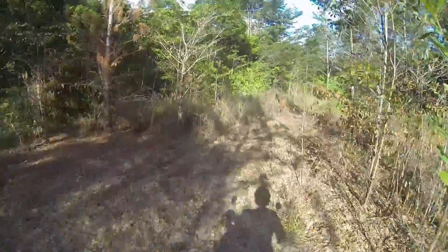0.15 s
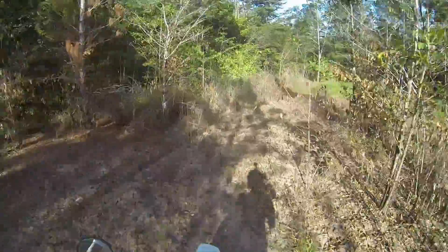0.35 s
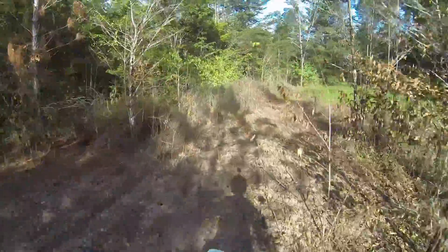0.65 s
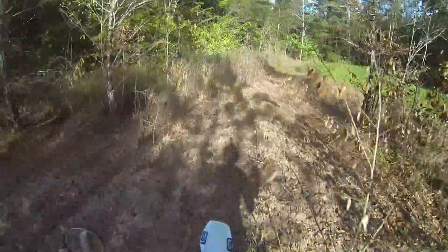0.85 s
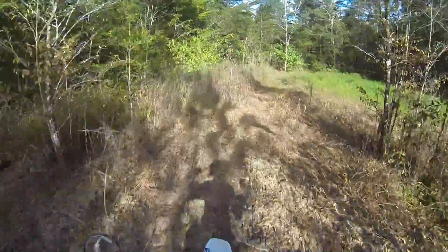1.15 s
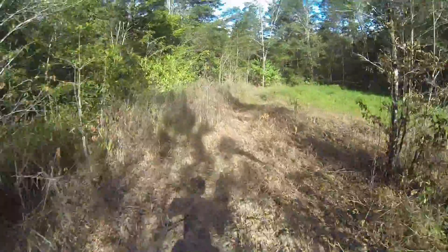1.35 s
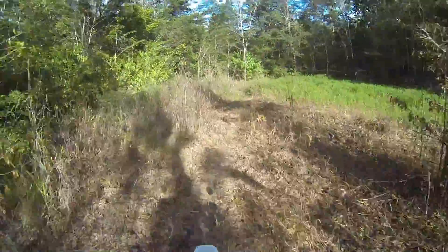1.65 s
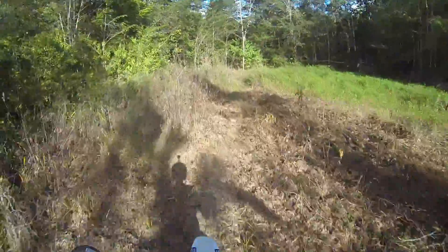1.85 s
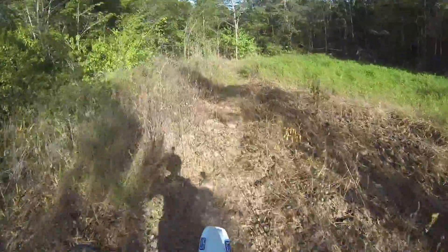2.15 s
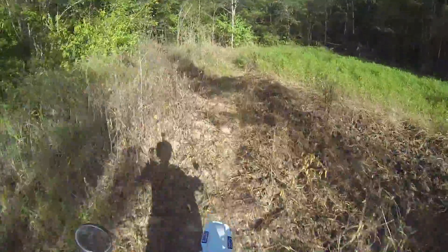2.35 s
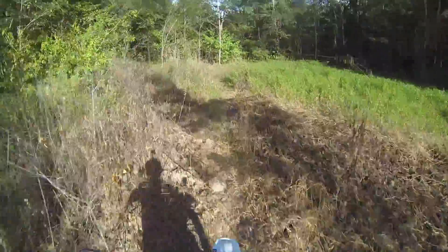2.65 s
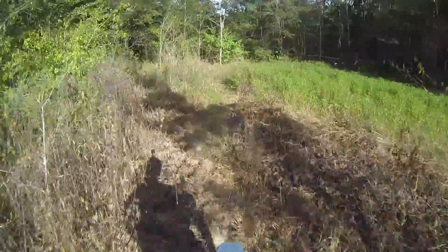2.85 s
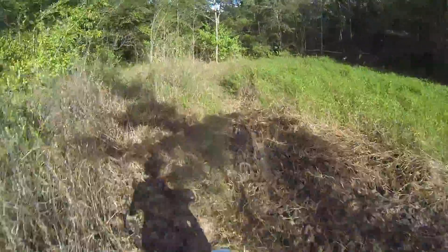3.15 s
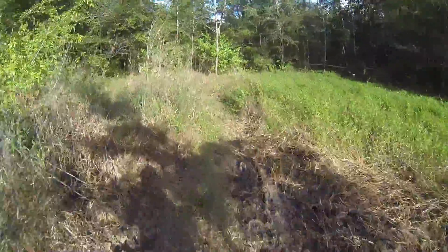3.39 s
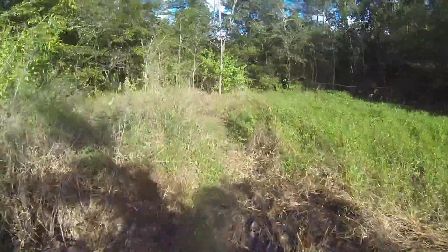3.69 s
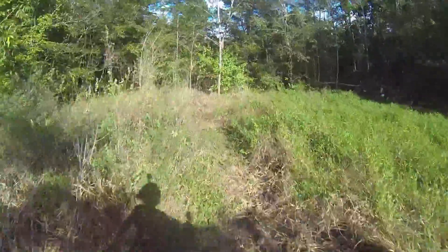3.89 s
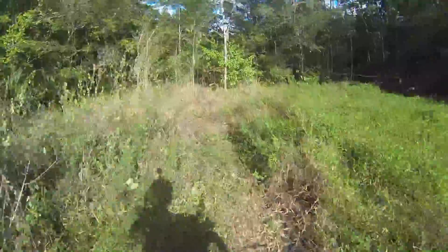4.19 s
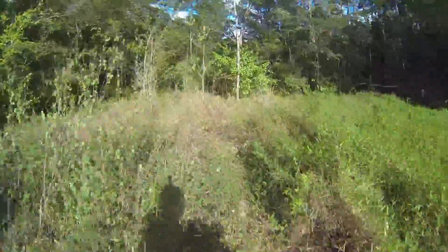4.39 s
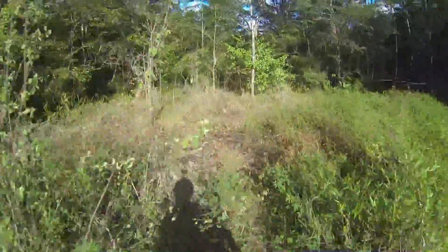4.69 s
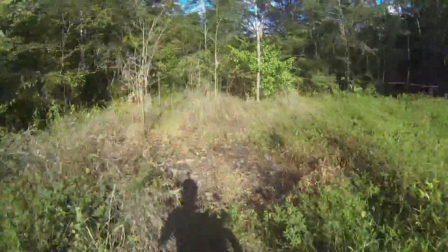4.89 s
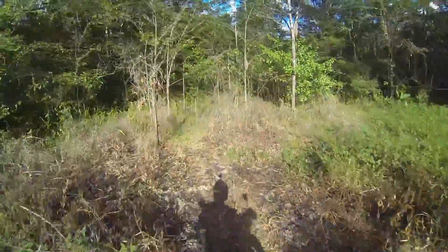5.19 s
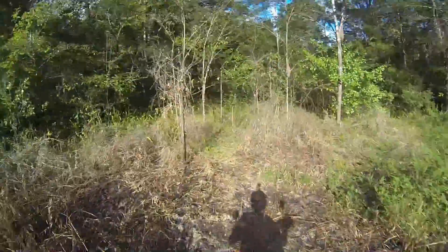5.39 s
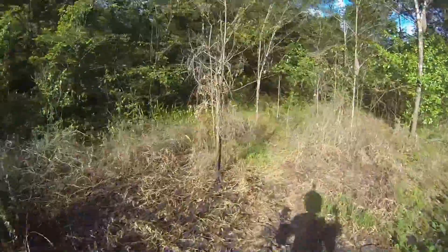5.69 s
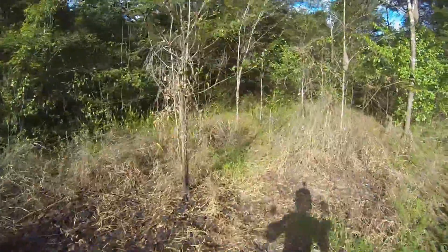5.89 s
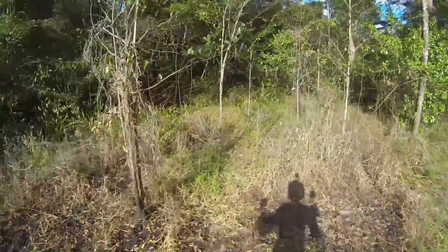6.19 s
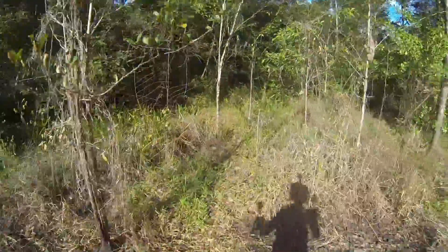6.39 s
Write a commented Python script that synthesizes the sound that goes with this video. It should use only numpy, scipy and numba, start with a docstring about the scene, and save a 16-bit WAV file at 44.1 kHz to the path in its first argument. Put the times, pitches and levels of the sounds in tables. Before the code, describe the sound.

Muffled two-stroke motorbike engine rises briefly, then drops toward idle amid frequent short knocks and low wind rumble.

```python
"""A small two-stroke dirt bike on a forest trail, heard from a helmet camera shut in its plastic case.
The engine is a pulse train with puffs of gas, dulled by the resonances of exhaust and case. Jolts
sway the camera on its mount near 105 Hz, knocks excite the modes of the case, and a loose part
chatters. Wind rumbles and thumps on the microphone membrane. A gain control ducks after each loud
thump or knock, over a faint hiss."""
import sys
import numpy as np
from scipy import signal
from scipy.io import wavfile
from scipy.ndimage import uniform_filter1d
from numba import njit

SR = 44100
rng = np.random.default_rng(int(sys.argv[2]) if len(sys.argv) > 2 else 0)


def put_to_file(sound):
    """Save the sound as 16-bit audio at rate SR, in the file named by the first command-line argument."""
    columns = np.atleast_2d(sound).T  # one column per channel
    safe = np.clip(columns, -1, 1)
    whole_steps = np.round(safe * 32767)
    wavfile.write(sys.argv[1], SR, whole_steps.astype(np.int16))


N = 288406


def engine():
    """Source and filter: uneven firings, each with a puff of gas, drive the exhaust and case resonances."""
    # course of the ride: (time [s], firing rate [Hz], relative level [dB])
    ride = [(0.0, 53.05, -44), (0.16, 51.55, -41), (0.62, 63.2, -44), (0.72, 64.22, -40.5),
            (1.26, 74.03, -38), (1.48, 78.37, -36.5), (1.69, 69.95, -48), (2.24, 55.45, -48),
            (2.57, 51.81, -46), (3.02, 42.06, -46.5), (3.4, 40.07, -44), (3.65, 43.32, -43.5),
            (3.84, 37.57, -44.5), (4.0, 38.66, -43.5), (4.33, 39.39, -53), (4.79, 39.81, -48.5),
            (5.1, 34.5, -49.5), (5.59, 32.17, -54), (5.85, 31.56, -50), (6.05, 31.97, -47.5),
            (6.15, 32.88, -46), (6.35, 32.32, -47.5), (6.54, 31.76, -53.5)]
    # resonances of exhaust and case: (frequency [Hz], nominal width [Hz], relative gain [dB])
    resonances = [(165, 52, -13.5), (233.4, 16, 8.5), (241.8, 20.4, 10.5), (302, 89, -0.5), (402, 74, 7.5),
                  (534, 45, 11.5), (710, 484, -1.5), (960, 64, 2.5), (1137, 210, 0.5), (1240, 45, 1),
                  (1560, 48, 4), (2470, 70, -12), (1650, 152, 2), (2147, 410, -11.5), (2610, 170, -14.5),
                  (2830, 840, -25.5), (3564, 396, -16.5), (3514, 84, -12.5), (4460, 1100, -28),
                  (6500, 6100, -41), (11000, 2800, -69.5)]
    # vibration through frame and rider: (multiple of the firing rate, relative level at full pull [dB])
    shake_orders = [(3, -7), (4, -7.5), (6, -19), (8, -21)]
    cruise_db, treble_from_hz = -46, 2300
    lope_start_s, lope_length_s, pickup_lope_db, idle_lope_db = 5.884, .24, -7.5, -3
    hz, db = curves(ride)
    pull_db = db - cruise_db
    clean = np.clip(.65 + .025 * pull_db, 0, 1)  # a harder pull fires more evenly
    treble_db = 3 + 4.5 * np.log2(hz / hz[0]) - .07 * pull_db  # rises with speed, trails the pull
    turns = np.cumsum(hz * (1 + .004 * walk(15))) / SR
    turns = turns + 500 - turns[int(lope_start_s * SR)]  # a strong firing opens the lope
    cycle = turns.astype(int)
    # lope: every other turn fires weakly near idle, more so as the engine picks up
    idle = np.clip((42 - hz) / 10, 0, 1)
    since = np.arange(N) / SR - lope_start_s
    lope_db = np.where((since > 0) & (since < lope_length_s), pickup_lope_db, idle_lope_db * idle)
    strength = undb(1.2 * rng.standard_normal(size=1000)[cycle] + lope_db * (cycle % 2 - .5))
    firings = level(np.diff(cycle, prepend=cycle[0]) * strength ** (1 - clean), 0)
    puffs = strength * np.exp(-(turns - cycle) / 0.35)
    rattle = .5 - .25 * idle  # less near idle, so the puffs stand apart
    gas = level((puffs + rattle) * rng.standard_normal(N), 0)
    low = np.sqrt(clean) * firings + np.sqrt(1 - clean) * gas
    middle = gas + (.75 + .1 * idle) * firings
    whirr = .6 * gas + .8 * rng.standard_normal(N)
    dull, bright = 0, 0
    for k, (centre_hz, width_hz, peak_db) in enumerate(resonances):
        if centre_hz < 600:
            drive = low
        elif centre_hz > treble_from_hz:
            drive = whirr
        else:
            drive = middle if width_hz < 300 else gas  # firings ring the narrow resonances
        polarity = (-1) ** (k * (width_hz > 50))
        flicker_db = min(centre_hz / 400, 1.5) * walk(25)
        ring = polarity * undb(peak_db + flicker_db) * band(drive, centre_hz, 1.4 * width_hz)
        if centre_hz < treble_from_hz:
            dull = dull + ring
        else:
            bright = bright + ring
    shake = sum(undb(order_db + 3.7 * walk(18)) * np.sin(2 * np.pi * order * turns)
                for order, order_db in shake_orders)
    return undb(db + 4.5) * ((dull + undb(treble_db) * bright) / np.std(dull) + clean * shake)


def mount():
    """Mass on a spring: the camera sways near its natural frequency, roughened by the trail."""
    sway_hz, wander_hz = 105.4, 2.1
    phase = 2 * np.pi * np.cumsum(sway_hz + wander_hz * walk(20)) / SR
    tone = np.sqrt(2) * undb(2.0 * walk(30)) * np.sin(phase)
    roughness = level(band(rng.standard_normal(N), 112, 49), -13.5)
    return swing() * (tone + roughness)


def swing():
    """Damped oscillation: each jolt lifts the mount's amplitude, which decays until it is caught."""
    # jolts of the trail: (time [s], level [dB], duration until caught [s])
    jolts = [(0.0, -23, 0.071), (0.09, -13, 0.1), (0.506, -10.5, 0.13), (0.698, -14, 0.1),
             (0.941, -10, 0.054), (1.086, -15.5, 0.14), (1.188, -14, 0.083), (1.299, -13.5, 0.21),
             (1.583, -10.5, 0.1), (1.731, -17, 0.089), (1.839, -14.5, 0.047), (1.957, -19, 0.1),
             (2.398, -23, 0.051), (2.447, -20.5, 0.05), (2.504, -17.5, 0.055), (2.596, -18.5, 0.49),
             (2.88, -15, 0.095), (3.02, -26.5, 0.059), (3.198, -29.5, 0.073), (3.537, -25, 0.11),
             (3.689, -17.5, 0.14), (3.857, -16.5, 0.1), (3.98, -16.5, 0.11), (4.11, -23, 0.21),
             (4.278, -20.5, 0.12), (4.455, -30.5, 0.046), (4.559, -17.5, 0.11), (4.691, -14, 0.18),
             (4.925, -21.5, 0.095), (5.007, -18, 0.16), (5.208, -30, 0.16), (5.346, -22, 0.071),
             (5.442, -24, 0.1), (5.658, -29.5, 0.21), (5.887, -25.5, 0.064), (6.057, -27, 0.11),
             (6.25, -31.5, 0.11), (6.471, -26.5, 0.039)]
    rise_s, catch_s, decay_db_per_s, rest_db = 0.0095, 0.032, 41, -39.5
    t = np.arange(N) / SR
    amplitude = np.full(N, undb(rest_db))
    for s, db, length in jolts:
        rise, catch = (t - s) / rise_s, (s + length - t) / catch_s + 1
        gate = np.clip(np.minimum(rise, catch), 0, 1)
        amplitude = np.maximum(amplitude, undb(db - decay_db_per_s * np.abs(t - s)) * gate)
    return amplitude


def knocks():
    """Modal ringing: knocks and a faint random rattle excite the case, each with its own mix of modes."""
    # blows on the case: (time [s], level [dB], dull, middle and bright parts re the main part [dB])
    impacts = np.array([(0.082, -30, -5.5, -2, -24), (0.1333, -28, -6, -1, -31),
                        (0.1926, -4.5, -16.5, -11, -10), (0.474, -27, -9, -3.5, -17),
                        (0.514, -25, -5.5, -4, -17), (0.5294, -13, -15.5, -7, -15.5),
                        (0.7012, -35.5, 3.5, 4.5, -25), (0.7778, -16.5, -8, -5.5, -18.5),
                        (0.947, -10.5, -13, -6.5, -22.5), (1.1432, -29, -3.5, -28, -21),
                        (1.305, -42.5, 11, -8, -22), (1.3309, -30, -1, 4, -7), (1.5203, -29, -5, -2, -28),
                        (1.5921, -23.5, 2.5, 6, -17.5), (1.745, -25.5, -17, -3.5, -16.5),
                        (1.8591, -35.5, -9, 0, -28), (1.9113, -50, 6, 17, -39), (1.9578, -27, -0.5, 5, -25),
                        (2.0088, -27, -13, -7, -18), (2.0464, -28.5, -3.5, 1.5, -35),
                        (2.1864, -42.5, 5, 2, 0), (2.407, -35, -14, 0, -31),
                        (2.4368, -11.5, -7.5, -2.5, -20), (2.4799, -34, -9, -11, -25),
                        (2.5105, -29.5, 1, 5, -16), (2.77, -36, -9, 2.5, -30),
                        (2.9217, -18.5, -9.5, -6, -22), (2.954, -41, 7, 6, -17),
                        (3.2117, -39.5, -9, -6, -7), (3.5335, -44.5, 9.5, -10, -27),
                        (3.587, -41, -4, -8, -10), (3.6921, -28, -17, -13, -29),
                        (3.719, -32, -17, -0.5, -25), (3.7545, -27.5, -11, -7, -32),
                        (3.856, -46, 8.5, -14, -34), (3.962, -55, 21, -2, -14), (4.0122, -25, -9, -2, -21),
                        (4.1118, -16.5, -8.5, -4, -14.5), (4.1942, -27, -7, -12, -15.5),
                        (4.2936, -39.5, 6, -13, -15), (4.481, -44.5, 3.5, -2, -25),
                        (4.638, -52, 15.5, 2.5, -27), (4.7115, -41, 1, 10.5, -5),
                        (4.7364, -28, -31, -3, -31), (4.9077, -48, -18, -11, 2),
                        (4.9339, -35.5, 0.5, -2, -27), (4.9551, -20, -9.5, -5.5, -17.5),
                        (5.0136, -31.5, 2, 0, -20), (5.0274, -39, -13, 7, -12), (5.1027, -49, 14, -4, -34),
                        (5.208, -55.5, 18, -9, -22), (5.25, -34.5, -29, -7, -19),
                        (5.2788, -27, -15, -1.5, -29), (5.3218, -41.5, 10.5, -0.5, -28),
                        (5.3472, -41, 1.5, -8, -4), (5.436, -54.5, -12, -15, -0.5),
                        (5.846, -41.5, -23, -16, -14), (5.905, -36.5, -4, -26, -11),
                        (6.4761, -36, -1, -3, -27)])
    # modes of the case: (frequency [Hz], relative gain [dB], time to decay by 60 dB [s])
    modes = [(133, 8, 0.086), (231, -2, 0.049), (410.3, 8, 0.065), (550.5, 4, 0.072), (818, -0.5, 0.0073),
             (885, -3.5, 0.034), (1060, 10.5, 0.015), (1473, -3.5, 0.016), (1726, 8.5, 0.008),
             (2345, -1, 0.027), (2560, 9, 0.017), (3106, 3, 0.014), (3587, 6, 0.01), (4440, -4.5, 0.0038),
             (5250, -10.5, 0.018), (5960, -11.5, 0.012), (10800, -16.5, 0.0037)]
    edges_hz = [800, 1280, 2300]  # between the dull, middle, main and bright parts
    touch, touch_lead_s, scrape_s, scrape_db = .3, .0006, .0012, -21
    rattle_place, rattle_strength = rng.random(size=(40, 2)).T
    at = (np.r_[impacts[:, 0], rattle_place * (N - 1) / SR] * SR).astype(int)
    blow_db = np.r_[impacts[:, 1], -52 + 11 * rattle_strength]
    rattle_parts_db = np.tile([-1.5, -4, -26], (len(rattle_place), 1))
    dull_db, middle_db, bright_db = np.vstack([impacts[:, 2:], rattle_parts_db]).T
    parts_db = [dull_db, middle_db, 0, bright_db]
    grit = undb(scrape_db) * rng.standard_normal(N)
    mix_db = 2 * rng.standard_normal((len(at), len(modes)))
    out = np.zeros(N)
    for k, (hz, db, t60) in enumerate(modes):
        blows = np.zeros(N)
        blows[at] = undb(blow_db + parts_db[np.searchsorted(edges_hz, hz)] + db + mix_db[:, k])
        blows = touch * blows + np.roll(blows, int(touch_lead_s * SR))  # a light touch comes first
        if hz > edges_hz[0]:  # upper modes start in one sharp spike and go on as a gritty scrape
            blows += grit * signal.lfilter([1], [1, -np.exp(-1 / (scrape_s * SR))], blows)
        else:
            blows *= (-1) ** k
        force = band(blows, hz, 150 + 0.9 * hz)
        pole = np.exp((2j * np.pi * hz - np.log(1000) / t60) / SR)
        out += signal.lfilter([0, pole.imag], [1, -2 * pole.real, abs(pole) ** 2], force)
    return out


def wind():
    """Turbulent pressure on the membrane: a deep rumble, and gusts that dent it with a slow rebound."""
    # wind rumble: (time [s], level [dB])
    rumble_levels = [(0.0, -18), (1.0, -19), (1.8, -18.5), (3.0, -21), (3.6, -26), (4.95, -15), (5.45, -20),
                     (6.54, -23)]
    # gusts that push the membrane in: (time [s], level [dB], time scale [ms])
    gusts = [(0.061, -5, 29), (0.477, -3.5, 8.1), (0.921, -7.5, 8.9), (1.236, -3, 9.6), (1.41, 10.5, 6.5),
             (1.808, -1.5, 12.4), (1.983, 6.5, 6.3), (2.144, 9, 7.25), (2.24, -6.5, 7.7),
             (2.352, -8.5, 9.3), (2.583, -4, 10), (2.84, 6, 8.4), (4.537, -7.5, 12.2), (5.151, -12.5, 30.5),
             (5.331, -4, 14.3), (6.026, -14, 16.3)]
    turbulence = rng.standard_normal(N) * undb(3.5 * walk(7.4))
    deep = level(resonator(resonator(turbulence, 18.75, 10.5), 16.7, 31), 0)
    skirt = level(band(turbulence, 60, 250), -22.5)
    out = undb(curves(rumble_levels)[0]) * (deep + skirt)
    snap = level(band(rng.standard_normal(N), 3700, 5000), 0)
    reach = np.arange(-SR // 20, SR // 10)
    for s, push_db, ms in gusts:
        at = int(s * SR) + reach
        u = reach / SR / (ms / 1000)
        dent = np.exp(-np.abs(u / 0.38) ** 1.68)
        rebound = 0.62 * np.exp(-((u - 1.7) / 0.8) ** 2) + 0.015 * np.exp(-((u + 0.6) / 2.0) ** 2)
        # the membrane crackles as it bottoms out, more on strong pushes
        crackle = undb(1.11 * push_db - 47) * np.exp(-((u + 0.1) / 0.43) ** 2) * snap[at]
        out[at] += undb(push_db) * (rebound - dent) + crackle
    return out


def chatter():
    """Noise-excited resonance: a small loose part chatters in short gritty bursts."""
    # bursts after bumps: (time [s], level [dB])
    bursts = [(1.2, -29.5), (2.942, -28.5), (0.18, -20)]
    t, half_length_s = np.arange(N) / SR, .0039
    envelope = sum(undb(db) * np.exp(-((t - s) / half_length_s) ** 2) for s, db in bursts)
    return envelope * level(band(rng.standard_normal(N), hz=2300, width_hz=800), 0)


def hiss():
    """Amplitude-modulated noise: three faint high bands prickle independently."""
    # top hiss: (time [s], relative level [dB])
    hiss_levels = [(0.0, -77), (0.5, -93.5), (1.25, -65), (2.2, -74.5), (3.4, -67), (4.0, -70.5),
                   (5.0, -63.5), (5.4, -70.5), (6.54, -70)]
    bands = sum(level(band(rng.standard_normal(N), hz, .5 * hz) * undb(2.5 * walk(70)), db)
                for hz, db in [(4500, -7.5), (7000, -7.0), (11500, -9.0)])
    return bands * undb(curves(hiss_levels)[0])


def undb(db):
    """Amplitude ratio of a level in dB."""
    return 10 ** (np.asarray(db) / 20)


def level(x, db):
    """Normalisation to an rms level in dB."""
    return x * undb(db) / np.sqrt(np.mean(x ** 2))


def curves(table):
    """Linear interpolation of a table's columns over time."""
    s, *columns = np.transpose(table)
    return [np.interp(np.arange(N) / SR, s, c) for c in columns]


def resonator(x, hz, width_hz):
    """Second-order resonance with unit gain at its centre."""
    return signal.lfilter(*signal.iirpeak(hz, hz / width_hz, SR), x)


def band(x, hz, width_hz):
    """Two equal resonators in cascade, each width_hz wide, give steeper skirts."""
    return resonator(resonator(x, hz, width_hz), hz, width_hz)


def walk(rate):
    """Slow random modulation: values held for 1 / rate s and smoothed twice; spread near 1."""
    k = int(SR / rate)
    held = np.repeat(rng.standard_normal(N // k + 1), k)
    return uniform_filter1d(uniform_filter1d(held, k), k)[:N] * 4 / 3


@njit
def follow(x, attack, release):
    """Envelope detection: rectify, then smooth with separate rates up and down."""
    y, e = np.empty(len(x)), 0.
    for i in range(len(x)):
        e += (abs(x[i]) - e) * (attack if abs(x[i]) > e else release)
        y[i] = e
    return y


def scene():
    """Superposition: the sources add at one microphone inside the case."""
    return (engine() + mount() + wind() + knocks() + chatter())[None]


def record(dry):
    """Compression: the gain ducks after loud peaks while the hiss stays; a low-pass cuts the top."""
    attack_s, release_s, threshold_db, top_hz = .0039, .06, -12.5, 15600
    envelope = follow(dry[0], 1 / (attack_s * SR), 1 / (release_s * SR))
    gain = np.minimum(undb(threshold_db) / (envelope + 1e-9), 1) ** 0.95
    out = np.clip(dry * gain, -1, 1) + hiss()
    return signal.sosfilt(signal.ellip(8, .2, 70, top_hz, fs=SR, output="sos"), out)


dry = scene()
out = record(dry)
put_to_file(out)
```